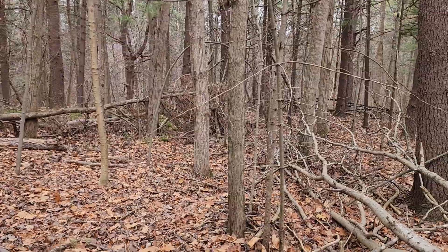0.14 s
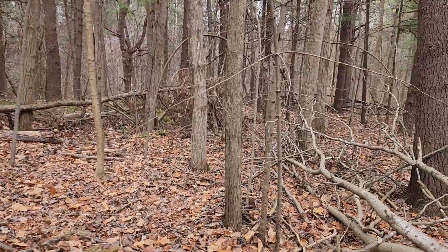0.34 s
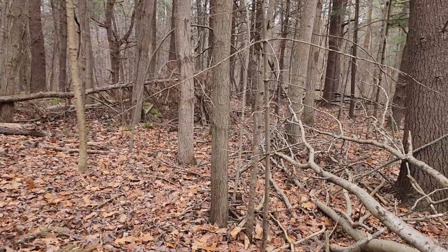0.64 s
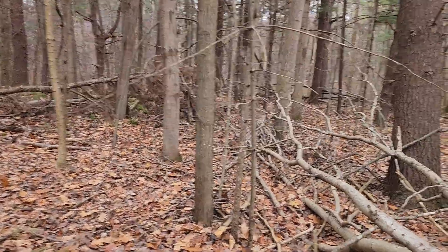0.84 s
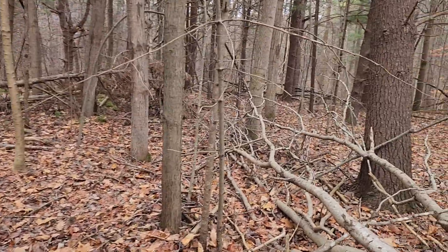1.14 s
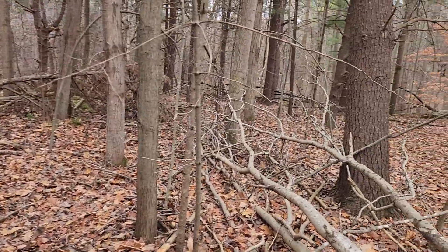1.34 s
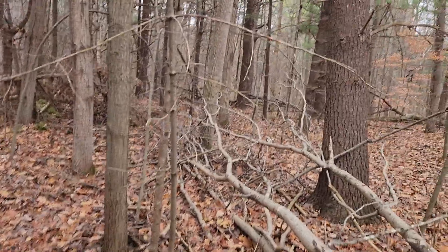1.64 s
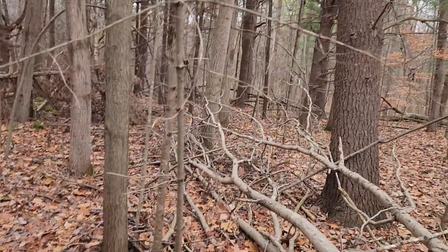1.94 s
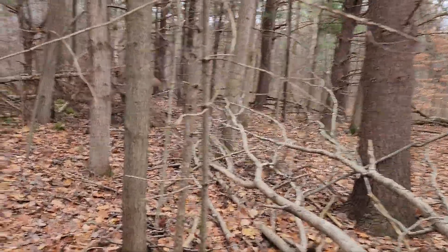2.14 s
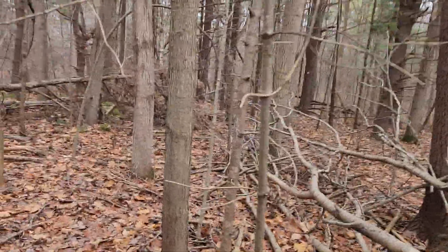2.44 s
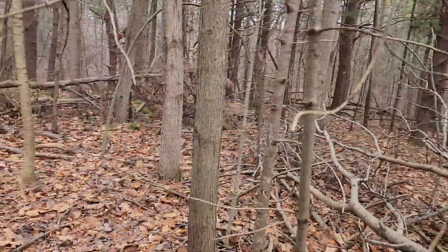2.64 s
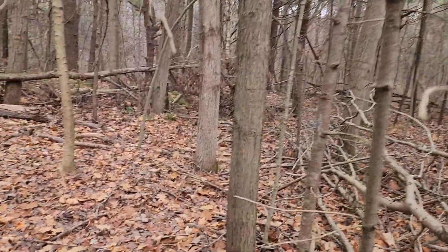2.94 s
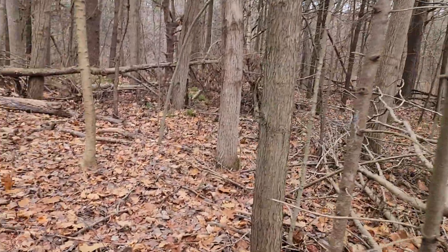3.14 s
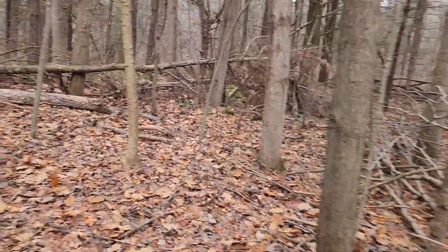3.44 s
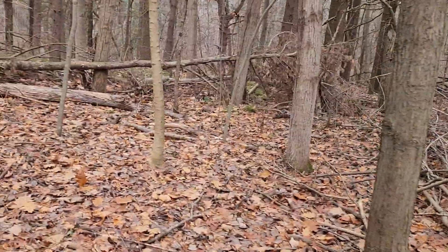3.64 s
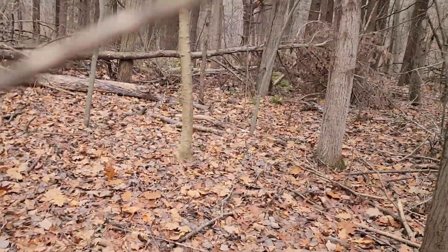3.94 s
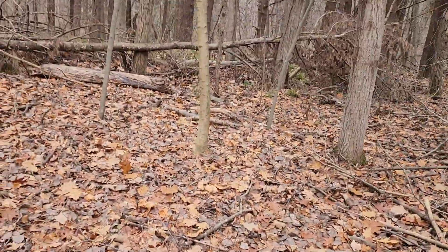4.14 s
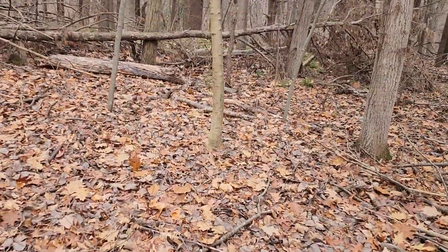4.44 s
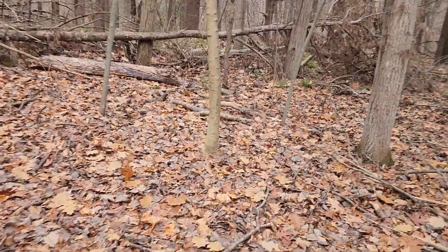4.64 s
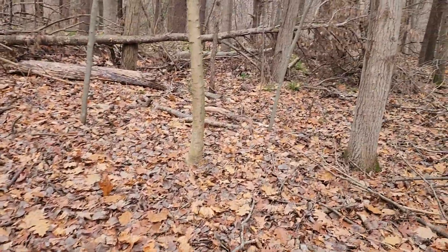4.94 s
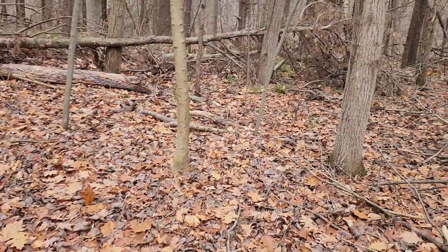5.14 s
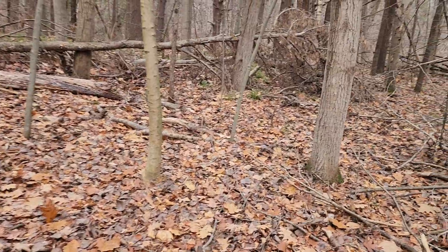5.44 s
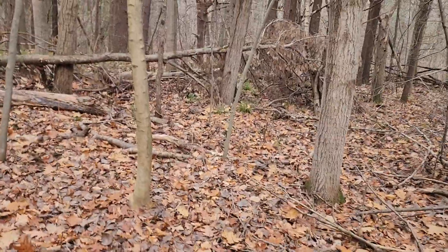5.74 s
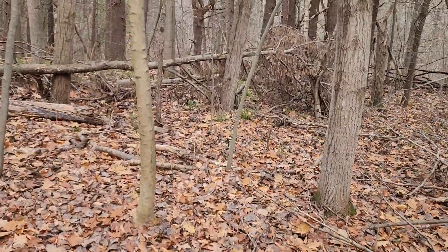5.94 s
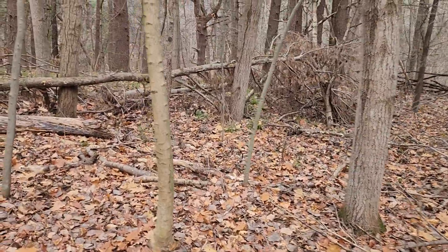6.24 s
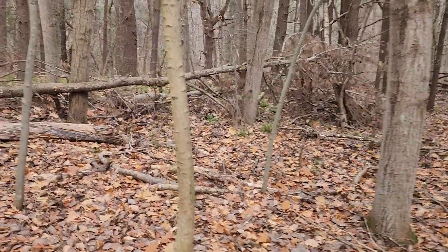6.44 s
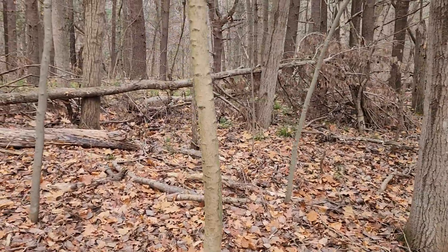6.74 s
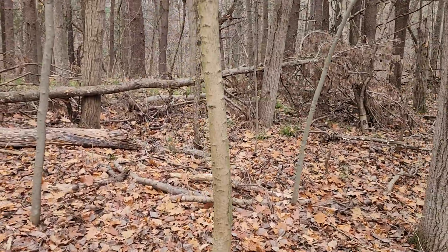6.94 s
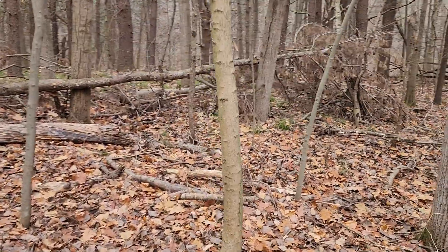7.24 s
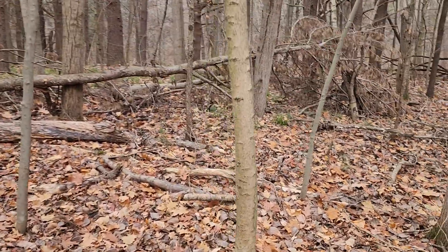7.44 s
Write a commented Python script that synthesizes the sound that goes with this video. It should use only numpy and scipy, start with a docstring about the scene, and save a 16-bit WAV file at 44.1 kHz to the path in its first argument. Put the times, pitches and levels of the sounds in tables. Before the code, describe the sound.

A quiet wood with a faint low rumble and soft airy hush, heard in close stereo by the walker. Light leaf swishes open the scene, then a crisp crunch lands at about 0.6 s. Further steps follow near 1.6, 2.4 and 3.4 s, each a dense swarm of dry leaf crackles swelling and collapsing, with soft rustling between. A twig snaps at 2.5 s; another cracks with a dull thud at 3.4 s. At 4.2 s a dead branch catches hard and scrapes past the left, a loud, very close cluster of woody cracks and coarse rasping, thinning out within about 0.3 s. A step at 4.5 s brings several twig snaps. Crunches continue near 5.6, 6.4 and 7.2 s, with long leafy swishes, narrow leaf rasps, small knocks and scattered ticks, and the rustling carries on to the end at about 7.6 s.

```python
"""Someone walks through deep dry leaves in a quiet wood, about one step a second.
Every step is a swarm of tiny random fractures, swelling under the sole and collapsing, with twigs snapping in it.
The other foot swishes on as arches of the same crackle; short noise knocks thud on the soil, leaves rasp, stalks tick.
Midway a dead branch catches and scrapes past the left microphone: decaying cracks over a coarse stick-slip crackle.
Shaped noise lays a low rumble and a faint hush underneath, and the trunks scatter a thin tail."""
import sys
import numpy as np
from scipy import signal
from scipy.fft import rfft, irfft, next_fast_len
from scipy.io import wavfile
from scipy.ndimage import map_coordinates

SR = 44100
rng = np.random.default_rng(int(sys.argv[2]) if len(sys.argv) > 2 else 0)


def transcribe(signal):
    """Save signal, clipped to [-1, 1], as a 16-bit WAV file at the path in sys.argv[1]."""
    frames = np.atleast_2d(signal).T
    limited = np.clip(frames, -1, 1)
    pcm = np.round(limited * 32767).astype(np.int16)
    wavfile.write(sys.argv[1], SR, pcm)


N = 335160

# Crunch is the middle-band level; crispness (treble) and weight (low end) are relative to it.
# Event levels stand ahead of the faders and microphone colour in scene().

# Low rumble, spectrum. Each row: frequency in Hz, relative density in dB per Hz.
RUMBLE_SPECTRUM = [(12, -34), (20, -12), (54, -1.5), (81, 1), (136, -5.5), (195, -16.5), (268, -18.5),
                   (300, -39), (390, -52), (660, -120)]
# Hush of the wood, spectrum. Each row: frequency in Hz, relative density in dB per Hz.
AIR_SPECTRUM = [(150, -13), (400, 5), (1000, -3.5), (4000, -14), (7000, -15), (16000, -45)]
# Stereo width. Each row: frequency in Hz, side minus mid in dB.
WIDTH = [(60, -21), (250, -16), (500, -14), (1000, -9), (2000, 1.5), (4000, -0.5), (12000, 0.5)]
# Scatter off the trunks. Each row: frequency in Hz, time to fall 60 dB in seconds.
TRUNK_DECAY = [(200, 0.51), (2000, 0.62), (12000, 0.91)]
# Colour of the two microphone ports. Each row: frequency in Hz, left minus right in dB.
PORT_COLOUR = [(60, 5), (300, 1.5), (700, 2.5), (1450, -3), (2300, -3), (3500, 3.5), (5000, 0), (7000, 1.5),
               (8800, -1), (11200, -4), (13200, 5), (15300, -1)]

# Branch sliding, harder as it bends, until it springs free.
# Each row: time in seconds, crunch in dB, left minus right in dB.
SLIDE = [(4.133, -85, 12), (4.185, -37, 18), (4.215, -42, 10), (4.24, -34.5, 11), (4.28, -29.5, 17),
         (4.365, -25, 5), (4.41, -34.5, 3), (4.47, -39.5, 0), (4.54, -78, 12)]
# Branch catching and slipping. Each row: time in seconds, crunch in dB, crispness in dB, left minus right in dB.
CATCHES = [(4.183, -33.5, 11, 15), (4.1903, -13, -3.5, 3.5), (4.1974, -16.5, 0, -1), (4.202, -21, -14, 8),
           (4.224, -20.5, -7, 6), (4.245, -21, -4, 20), (4.2556, -18.5, -2, 13), (4.271, -15.5, -0.5, 20),
           (4.278, -20.5, 9, 14), (4.295, -19.5, 5, 9), (4.313, -36, 12, 13), (4.332, -31, 13, -12),
           (4.39, -34, 18.5, 11), (4.481, -33.5, 12.5, 4), (4.483, -43, 15, 14)]
# Bark catching, spectrum. Each row: frequency in Hz, relative density in dB per Hz.
BARK_SPECTRUM = [(100, -5), (500, -5.5), (800, 0), (1100, 6.5), (1220, 4), (1400, 8.5), (1800, -4.5),
                 (2300, -0.5), (3000, -10.5), (4200, 9.5), (5200, -1.5), (6500, 3.5), (10000, -6),
                 (16000, -4.5)]
# Bark scraping, spectrum. Each row: frequency in Hz, relative density in dB per Hz.
SCRAPE_SPECTRUM = [(150, -12), (700, 2), (1300, 0.5), (2200, -3), (3100, 0.5), (4300, 0.5), (5200, 0.5),
                   (7400, 4.5), (10400, -5.5), (15000, -6)]
CATCH_WEIGHT_DB = -16.5
# the slide gets crisper as the contact runs out to the thin tip
SLIDE_CRISP_DB, SLIDE_WEIGHT_DB, TIP_DB_PER_S = 0.5, -9.5, 32

# Dull knocks of feet on soil, roots and fallen wood.
# Each row: start in seconds, peak in dB, pitch in Hz, time to fall 60 dB in seconds.
THUDS = [(1.382, -32, 154.6, 0.028), (1.388, -37, 350, 0.048), (1.669, -34, 256, 0.12),
         (3.437, -26.5, 116, .13), (4.135, -37.5, 490, .015), (4.229, -28.5, 110, 0.24),
         (4.346, -29.5, 75, 0.21), (4.546, -33, 151, 0.11), (4.628, -25, 143, 0.042),
         (5.656, -28, 428, 0.026), (5.856, -25.5, 300, 0.051), (5.952, -31, 774, 0.024),
         (7.297, -27, 406, 0.014)]
# Stiff leaves rubbing with a narrow rasp.
# Each row: start in seconds, peak in dB, pitch in Hz, time to fall 60 dB in seconds.
RASPS = [(2.3933, -26, 1560, .03), (3.265, -26, 1470, 0.022), (3.515, -18, 1350, 0.01),
         (5.415, -19.5, 2040, 0.12), (5.46, -31, 2230, .18), (5.835, -26.5, 1990, 0.18),
         (6.345, -27, 1400, 0.064), (7.012, -26, 5600, 0.045), (7.057, -30, 3300, 0.039),
         (7.312, -19, 3400, 0.2)]

# Twigs breaking, from faint ticks to loud cracks. Each row: time in seconds, crunch in dB, crispness in dB,
# weight in dB, time to fall 60 dB in seconds before twigs() stretches it.
TWIG_BREAKS = [(0.888, -48, 15.5, -1, 0.0056), (0.929, -39.5, 6, -12, .009), (1.67, -31, 11.5, -3, 0.09),
               (1.749, -34, 3, -2, 0.018), (2.33, -39.5, 3.5, -9.5, 0.012),
               (2.531, -22, 7.5, -13.5, 0.0098), (2.905, -44, 0, 0.5, 0.011), (3.435, -21, 8, -6.5, 0.017),
               (3.508, -36.5, 14.5, -8, 0.0073), (4.472, -25, 14, -11, 0.07), (4.568, -24, 7, -2, .008),
               (4.595, -22.5, 11.5, -9, 0.036), (4.63, -16.5, -2.5, -13, 0.032),
               (4.672, -25, -10, -12.5, 0.0073), (4.96, -48, 14, -3, 0.015), (5.419, -33.5, 1, -8, 0.005),
               (5.404, -34, 11, -19, 0.011), (5.619, -32, 4, -29, 0.0031), (5.755, -27, -15, -8, .005),
               (5.98, -54, 20, -8, .007), (6.039, -53, 19, -12, 0.0081), (6.17, -39, 3, -8, 0.011),
               (6.207, -33.5, -8, -7, 0.0088), (6.436, -39.5, 23, 4, 0.073), (6.476, -23, 8, -6, 0.0068),
               (6.664, -23.5, 0, -4, .012), (6.783, -24, 7, -12, 0.011), (6.825, -39.5, 2, -13, 0.0096),
               (6.96, -44, 23, 3.5, 0.043), (7.011, -43.5, 6, -4, 0.017), (7.298, -32, 12.5, 2.5, 0.0031),
               (7.334, -26.5, 4, -7, 0.0064), (7.383, -25.5, 5.5, -2.5, .009)]
# Twig, spectrum. Each row: frequency in Hz, relative density in dB per Hz.
TWIG_SPECTRUM = [(100, -4), (400, 5), (1300, 6.5), (2200, 1.5), (3600, -6.5), (5000, -3.5), (7500, 1),
                 (9000, 1.5), (10300, -7), (12000, -3.5), (16000, -5.5)]
# stalk ticks, in dB: mean level above the crunch of the moment, scatter, crispness, weight, loudest level
STALK_COUNT = 26
STALK_DB, STALK_SPREAD_DB, STALK_CRISP_DB, STALK_WEIGHT_DB, STALK_TOP_DB = -1, 3.5, 12, -5, -40

# Footfalls. Each row: touch-down in seconds, roll from heel to full weight in seconds,
# crunch in dB, crispness in dB, weight in dB.
STEPS = [(0.567, 0.1, -32.5, 5, -22), (1.613, 0.038, -31, 7, -5.5), (2.394, 0.06, -30, 5.5, -8.5),
         (3.393, 0.072, -35, 9, -3.5), (4.469, 0.11, -30.5, 7.5, -6), (5.575, 0.097, -30.5, 7, -4.5),
         (6.354, 0.11, -32.5, 5.5, -9.5), (7.149, 0.17, -35.5, 10.5, -3.5)]
# the sound swells as the sole brushes the top leaves, until CONTACT_S after touch-down
BRUSH_DB_PER_S, CONTACT_S = 600, 0.0084
# first contact under the peak, collapse of the crunch, then the trodden leaves springing back
CONTACT_DB, FALL_DB_PER_S, SETTLE_DB, SETTLE_DB_PER_S = -8.5, 109, -15, 43
# Foot lifting or swinging through the litter.
# Each row: start in seconds, length in seconds, crunch in dB, crispness in dB.
SWISHES = [(0.12, 0.28, -51, 5.5), (0.353, 0.28, -47.5, 2), (0.75, 0.094, -43, 8), (0.885, 0.086, -44, 7),
           (1.122, 0.094, -49.5, 7), (1.482, 0.21, -46, 7.5), (2.326, .035, -49, 8.5),
           (2.52, 0.064, -39.5, 9.5), (2.758, .14, -49.5, 9.5), (3.235, 0.21, -50, 7),
           (3.586, 0.19, -50, 5), (3.887, 0.1, -54, 8), (4.963, 0.71, -48, 4.5), (5.26, 0.35, -41, 1.5),
           (5.78, 0.2, -48.5, 6), (6.577, .17, -47, 7), (7.138, 0.16, -40, -5), (7.46, 0.42, -45, 7.5)]
SWISH_WEIGHT_DB, SWISH_ARCH = -8, 0.41  # the arch is a power of a half sine
# Light rustle that goes on between steps. Each row: time in seconds, crunch in dB.
RUSTLE = [(0.0, -73), (0.08, -68), (0.14, -64), (1.0, -54.5), (1.85, -64), (2.28, -73), (2.7, -57.5),
          (4.12, -59), (5.0, -58), (6.15, -57), (6.3, -63.5), (6.5, -56.5), (7.6, -54)]
RUSTLE_CRISP_DB, RUSTLE_WEIGHT_DB = 9.5, 1.5
# Leaf, spectrum. Each row: frequency in Hz, relative density in dB per Hz.
LEAF_SPECTRUM = [(100, -21.5), (330, -5.5), (550, -1.5), (1000, 1), (1700, 0.5), (2400, -5), (3600, -7.5),
                 (5000, -3.5), (6500, -4), (8700, -4), (10200, -12), (11800, -7), (15700, -11)]
# A light touch lacks the band of real crushing and sounds hollow.
# Each row: frequency in Hz, share missing at the lightest touch as a fraction.
HOLLOW = [(1600, 0), (2300, 0.3), (4000, 0.14), (5500, 0.051)]
# crunch below which the hollow sets in, and the further drop over which it deepens
HOLLOW_BELOW_DB, HOLLOW_RANGE_DB = -45, 11.5


def amp(db):
    """Decibels to gain."""
    return 10 ** (np.asarray(db) / 20)


def unit(x):
    """x at rms 1."""
    return x / np.sqrt(np.mean(x ** 2) + 1e-20)


def noise(length):
    """Two unrelated channels of white noise."""
    return rng.standard_normal((2, length))


def along(points, hz):
    """(Hz, value) points read on a log axis."""
    f, v = np.transpose(points)
    return np.interp(np.log(hz + 1), np.log(f + 1), v)


def curves(rows):
    """One value per sample for each column after the time."""
    s, *cols = np.transpose(rows)
    return [np.interp(np.arange(N) / SR, s, c) for c in cols]


def wobble(rate):
    """A smooth random curve, rate knots a second."""
    knots = rng.standard_normal(int(N * rate / SR) + 4)
    return map_coordinates(knots, [np.arange(N) * rate / SR])


def filtered(x, response):
    """x times a response of frequency."""
    size = x.shape[-1]
    m = next_fast_len(size + 2048)
    spectrum = rfft(x, m) * response(np.fft.rfftfreq(m, 1 / SR))
    return irfft(spectrum, m)[..., :size]


def add(track, s, sound):
    """Mix a stereo sound in at time s."""
    part = track[:, max(round(s * SR), 0):][:, :sound.shape[1]]
    part += sound[:, :part.shape[1]]


def stereo(pair, spectrum):
    """Two unrelated signals become mid and side of one coloured sound, its width set by frequency."""
    def colour(hz):
        mid_and_side = np.array([np.ones_like(hz), amp(along(WIDTH, hz))])
        return amp(along(spectrum, hz)) * mid_and_side
    mid, side = filtered(pair, colour)
    return np.array([mid + side, mid - side])


def pan(lean_db):
    """Left and right gains of constant power; positive leans left."""
    gains = amp(np.array([lean_db, -lean_db]) / 2).reshape(2, -1)
    return gains / np.sqrt(np.mean(gains ** 2, axis=0))


def voiced(x, crunch_db, crisp_db, weight_db):
    """Set the middle of x to the crunch level, with treble and low end relative to it."""
    edges = [130, 240, 500, 1000, 2400, 4400]  # Hz
    # the low and middle bands overlap a little
    shapes = [0, 0.81, 0.82, 0, 0.5, 0], [0, 0.7, 0, 1, 1, 0], [0, 0, 0, 0, 0, 1]
    low, middle, high = (unit(filtered(x, lambda hz: along(list(zip(edges, shape)), hz))) for shape in shapes)
    return amp(crunch_db) * (middle + amp(crisp_db) * high + amp(weight_db) * low)


def uneven(x, depth_db, width_hz, hold_s):
    """Every leaf and stick has resonances of its own: random peaks width_hz wide that last hold_s."""
    z = signal.stft(x, nperseg=256)[2]
    spacing = np.array([width_hz * 256 / SR, hold_s * SR / 128])  # in bins and frames
    place = np.indices(z.shape[1:]) / spacing[:, None, None]
    field = map_coordinates(rng.standard_normal(z.shape[1:]), place, order=2, mode="mirror")
    return signal.istft(z * amp(depth_db * field), nperseg=256)[1][:, :x.shape[1]]


def crackle(rate, spread_db, t60):
    """Random tiny fractures, rate a second, each a burst of its own size that dies in t60; rms 1."""
    breaks = rng.random(N) < rate / SR
    size = amp(spread_db * np.minimum(rng.standard_normal(N), 2))
    energy = breaks * size ** 2 / rate
    fade = amp(-60 / (t60 * SR)) ** 2
    power = signal.lfilter([1], [1, -fade], energy)  # unrelated bursts add in power
    return unit(np.sqrt(power) * noise(N))


def snap(spectrum, t60, bounce_db, bounce_s, tail_db, tail_t60):
    """One break: a sharp crack, its bounce off a near surface, and a weak shiver of the wood."""
    t = np.arange(-SR // 200, SR // 12) / SR

    def decay(start, life):
        return (t >= start) * amp(-60 * np.abs(t - start) / life)

    crack = decay(0, t60)
    bounce = amp(bounce_db) * decay(bounce_s * rng.uniform(.7, 1.3), t60)
    shiver = amp(tail_db) * decay(0, tail_t60)
    wood = uneven(noise(len(t)), depth_db=2.5, width_hz=380, hold_s=.08)
    return stereo(wood * (crack + bounce + shiver), spectrum)


def add_snap(track, s, sound, crunch_db, crisp_db, weight_db):
    """Mix in a snap; its levels are those of its energy gathered into 5 ms."""
    span = .005  # also the silence ahead of the crack
    gathered = np.sqrt(span * SR / sound.shape[1])
    add(track, s - span, voiced(sound, crunch_db, crisp_db, weight_db) * gathered)


def knock(spectrum, t60, attack):
    """One coloured noise burst with a soft onset and an exponential decay; peak 1."""
    t = np.arange(SR // 6) / SR
    burst = stereo(noise(len(t)), spectrum) * amp(-60 * t / t60) * (1 - np.exp(-t / attack))
    return burst / np.abs(burst).max()


def background(rumble_db=-49.0, air_db=-63):
    """A slightly wavering low rumble and the faint hush of the wood."""
    rumble = unit(stereo(noise(N), RUMBLE_SPECTRUM)) * amp(rumble_db + 0.58 * wobble(8.1))
    air = unit(stereo(noise(N), AIR_SPECTRUM))
    return pan(0.83) * rumble + amp(air_db) * air


def trunks(x):
    """The trees scatter back a thin, late tail: decaying noise that starts after 10 ms."""
    hz, t, z = signal.stft(noise(SR // 2), SR, nperseg=256)
    fade = amp(-60 * t / along(TRUNK_DECAY, hz)[:, None])
    tail = signal.istft(z * fade, SR, nperseg=256)[1]
    tail = np.pad(tail / np.linalg.norm(tail[0]), ((0, 0), (SR // 100, 0)))
    return signal.fftconvolve(x, tail, axes=1)[:, :N]


def branch():
    """Rough bark sticks and slips close to the left microphone: hard catches over a coarse scrape."""
    slide_db, lean_db = curves(SLIDE)
    slid_s = np.clip(np.arange(N) / SR, SLIDE[0][0], SLIDE[-1][0]) - SLIDE[0][0]
    crisp_db = SLIDE_CRISP_DB + TIP_DB_PER_S * slid_s
    slips = crackle(np.full(N, 700.), spread_db=0.5, t60=0.02)
    slips = uneven(slips, depth_db=-0.5, width_hz=360, hold_s=0.012)
    out = pan(lean_db) * voiced(stereo(slips, SCRAPE_SPECTRUM), slide_db, crisp_db, SLIDE_WEIGHT_DB)
    for s, crunch_db, crisp_db, lean_db in CATCHES:
        catch = snap(BARK_SPECTRUM, 0.0054, bounce_db=-14, bounce_s=0.0024, tail_db=-17.5, tail_t60=0.051)
        add_snap(out, s, pan(lean_db) * catch, crunch_db, crisp_db, CATCH_WEIGHT_DB)
    return out


def thuds(attack=0.0011):
    """The soft ground answers a foot with a brief, broad low knock."""
    out = np.zeros((2, N))
    for s, db, hz, t60 in THUDS:
        soil = [(hz / 4, -25), (hz / 1.3, -3), (hz, 0), (hz * 1.03, -7), (hz * 4, -30), (hz * 10, -70)]
        add(out, s, amp(db) * knock(soil, t60, attack))
    return out


def rasps(attack=0.0009, sharpness=1.08):
    """A leaf dragged over another sounds in one narrow resonance."""
    out = np.zeros((2, N))
    for s, db, hz, t60 in RASPS:
        blade = [(hz / 4, -35), (hz / sharpness, -13), (hz, 0), (hz * sharpness, -13), (hz * 4, -27)]
        add(out, s, amp(db) * knock(blade, t60, attack))
    return out


def twigs():
    """Twigs hidden in the litter break under the sole."""
    out = np.zeros((2, N))
    for s, crunch_db, crisp_db, weight_db, t60 in TWIG_BREAKS:
        crack = snap(TWIG_SPECTRUM, t60 * 1.08, bounce_db=-18, bounce_s=0.0034, tail_db=-12.5, tail_t60=0.028)
        add_snap(out, s, crack, crunch_db, crisp_db, weight_db)
    return out


def stalks(first_s=0.77, stalk_t60=0.012):
    """Once the walk is under way, small stalks give way at random moments, louder under harder treading."""
    out, crunch_db = np.zeros((2, N)), tread()[0]
    for slot in range(STALK_COUNT):
        s = first_s + (N / SR - first_s) * (slot + rng.random()) / STALK_COUNT
        size, colour = STALK_SPREAD_DB * np.clip(rng.standard_normal(2), -2, 2)
        crunch_now = crunch_db[min(int(s * SR), N - 1)]
        db = min(crunch_now + STALK_DB + size, STALK_TOP_DB)
        tick = snap(TWIG_SPECTRUM, stalk_t60, bounce_db=-16, bounce_s=0.005, tail_db=-15, tail_t60=0.03)
        add_snap(out, s, tick, db, STALK_CRISP_DB + colour - size, STALK_WEIGHT_DB)
    return out


def footfall(t, roll_s):
    """Gain of one step, t from touch-down: the crunch swells as the sole rolls down, collapses, and settles."""
    brush_db = BRUSH_DB_PER_S * np.minimum(t - CONTACT_S, 0)
    loading_db = CONTACT_DB * np.clip(1 - t / roll_s, 0, 1)
    after = np.maximum(t - roll_s, 0)
    release_db = np.maximum(-FALL_DB_PER_S * after, SETTLE_DB - SETTLE_DB_PER_S * after)
    return amp(brush_db + loading_db + release_db)


def swish(t, length_s):
    """Gain of a foot passing through the leaves: one smooth arch."""
    return np.abs(np.sin(np.pi * np.clip(t / length_s, 0, 1))) ** SWISH_ARCH


def tread(restless_db=0.5, restless_rate=13):
    """Steps, swishes and the restless rustle add in power: crunch, crispness and weight of the litter in dB."""
    t = np.arange(N) / SR
    rustle_db, = curves(RUSTLE)
    rustle = amp(rustle_db + restless_db * wobble(restless_rate))
    moves = [(rustle, RUSTLE_CRISP_DB, RUSTLE_WEIGHT_DB)]
    for s, roll_s, db, crisp_db, weight_db in STEPS:
        moves.append((amp(db) * footfall(t - s, roll_s), crisp_db, weight_db))
    for s, length_s, db, crisp_db in SWISHES:
        moves.append((amp(db) * swish(t - s, length_s), crisp_db, SWISH_WEIGHT_DB))
    power = sum(np.outer(amp([0, crisp_db, weight_db]), gain) ** 2 for gain, crisp_db, weight_db in moves)
    middle_db, high_db, low_db = 10 * np.log10(power)
    return middle_db, high_db - middle_db, low_db - middle_db


def leaves(full_rate=3600, full_db=-30, growth=0.26, rub_db=-5, tick_db=-12, tick_share=.03):
    """Harder treading breaks more leaves a second; stems tick among them, and leaf sliding on leaf hisses softly."""
    crunch_db, crisp_db, weight_db = tread()
    rate = full_rate * amp(growth * (crunch_db - full_db))  # full_rate breaks a second at full_db
    blades = crackle(rate, spread_db=5, t60=.004)
    stems = crackle(tick_share * rate, spread_db=0, t60=0.0095)
    litter = blades + amp(tick_db) * stems + amp(rub_db) * noise(N)
    clumps = amp(0.64 * wobble(70))  # leaves give way in bunches
    litter = uneven(litter * clumps, depth_db=2.0, width_hz=501, hold_s=.03)
    sound = voiced(stereo(litter, LEAF_SPECTRUM), crunch_db, crisp_db, weight_db)
    lightness = np.clip((HOLLOW_BELOW_DB - crunch_db) / HOLLOW_RANGE_DB, 0, 1)
    return sound - lightness * filtered(sound, lambda hz: along(HOLLOW, hz))


def scene(wood_db=-16, branch_db=-1.5, leaves_db=-0.87, twigs_db=-0.5, twig_lean_db=-0.5):
    """The feet sound into the wood; the branch is too close to wake it. Each microphone port has its own colour."""
    litter = amp(leaves_db) * leaves()
    breaks = amp(twigs_db) * pan(twig_lean_db) * twigs()
    feet = litter + breaks + stalks() + thuds() + rasps()
    near = feet + amp(wood_db) * trunks(feet) + amp(branch_db) * branch()
    return filtered(near, lambda hz: pan(along(PORT_COLOUR, hz))) + background()


def record(dry):
    """Clip at full scale, then keep nothing above the 16 kHz band limit."""
    return filtered(np.clip(dry, -1, 1), lambda hz: hz < 16000)


dry = scene()
out = record(dry)
transcribe(out)
```